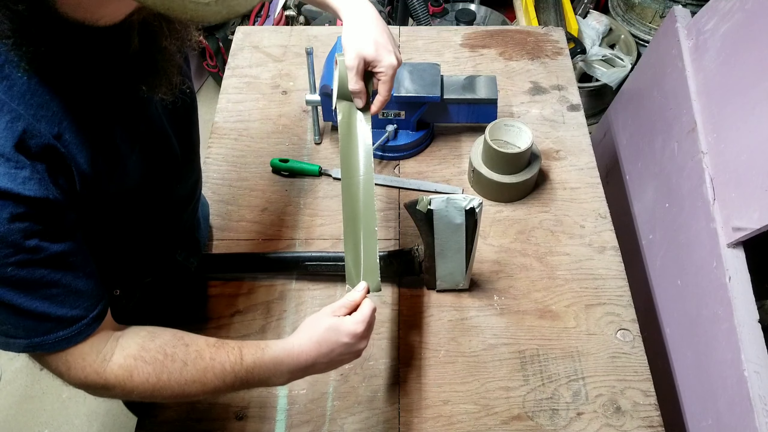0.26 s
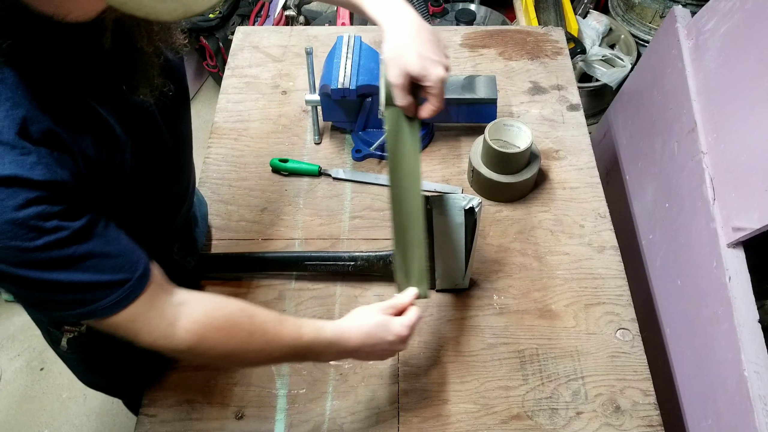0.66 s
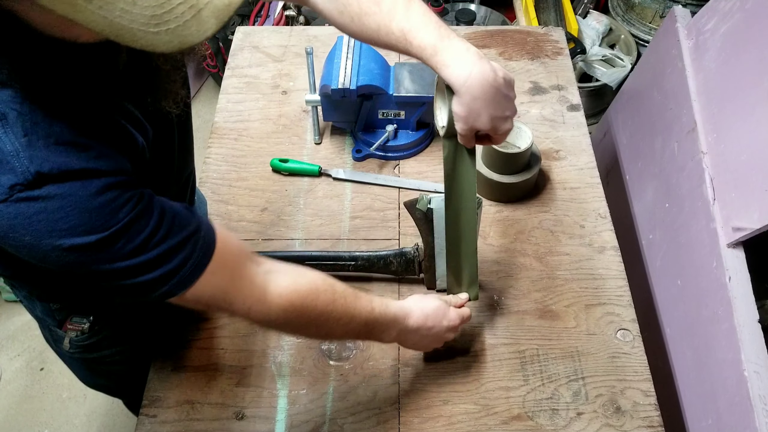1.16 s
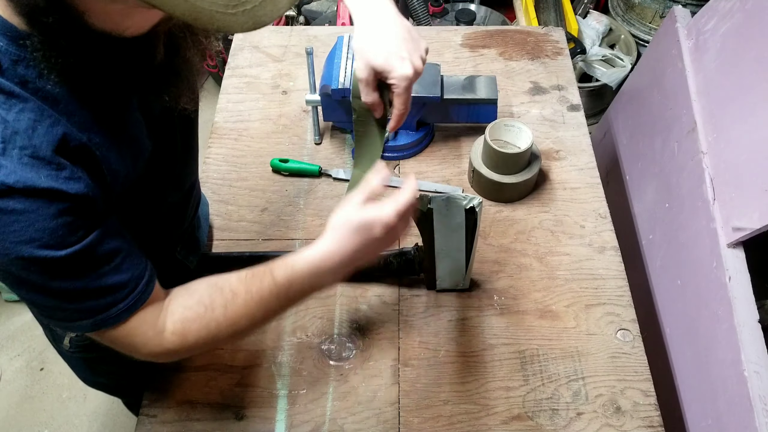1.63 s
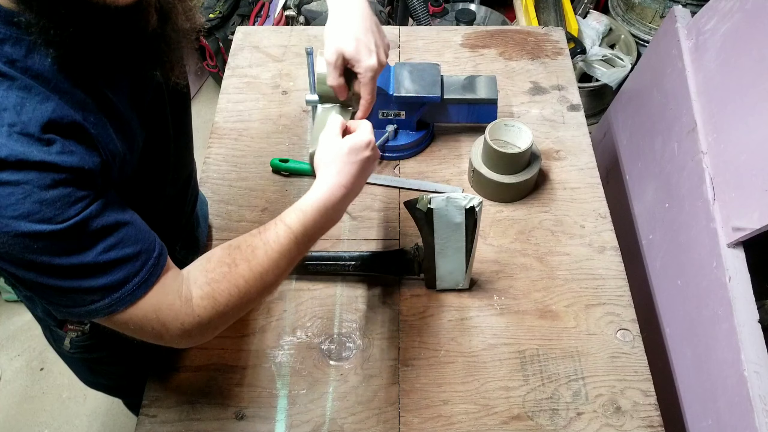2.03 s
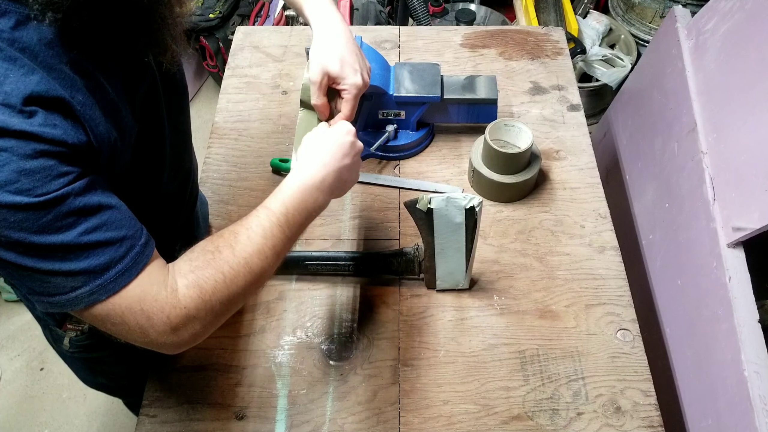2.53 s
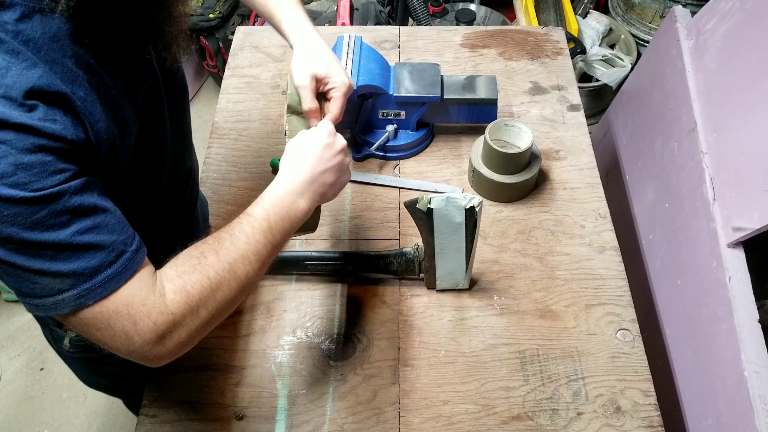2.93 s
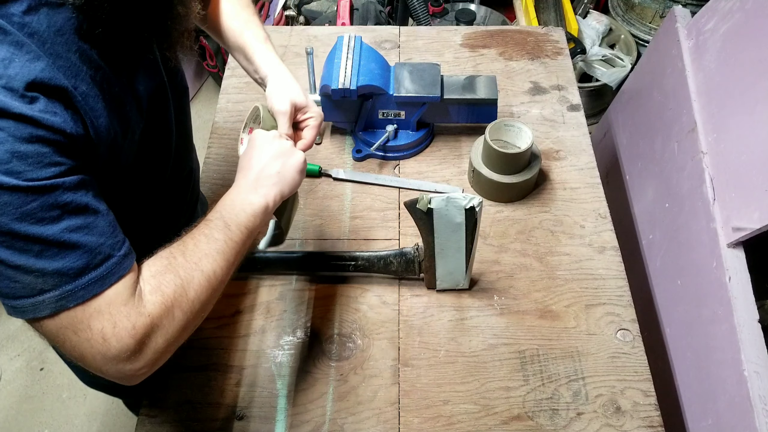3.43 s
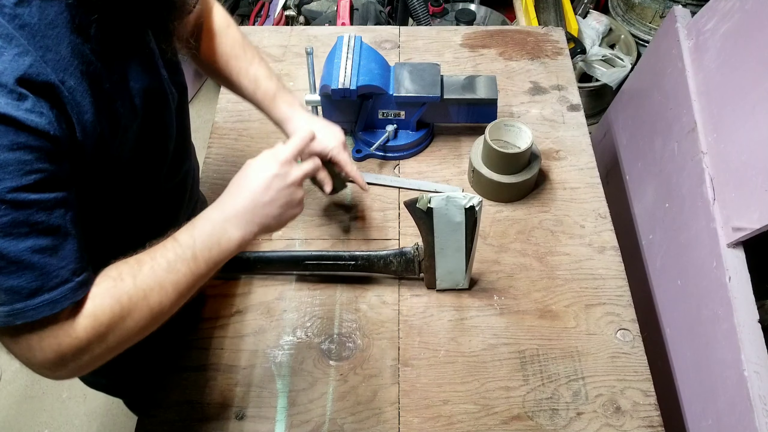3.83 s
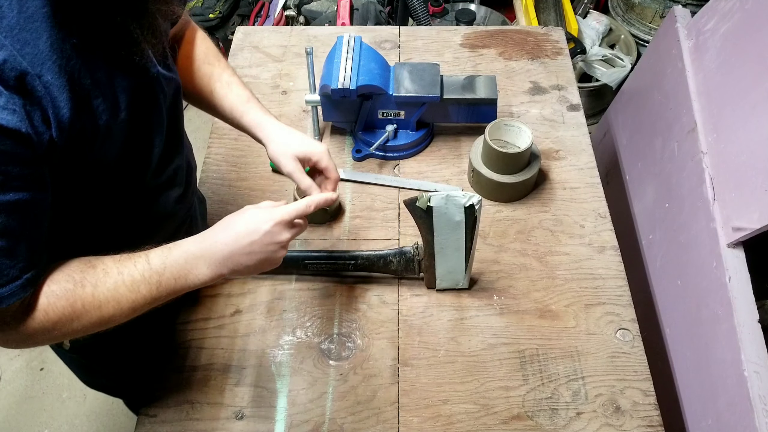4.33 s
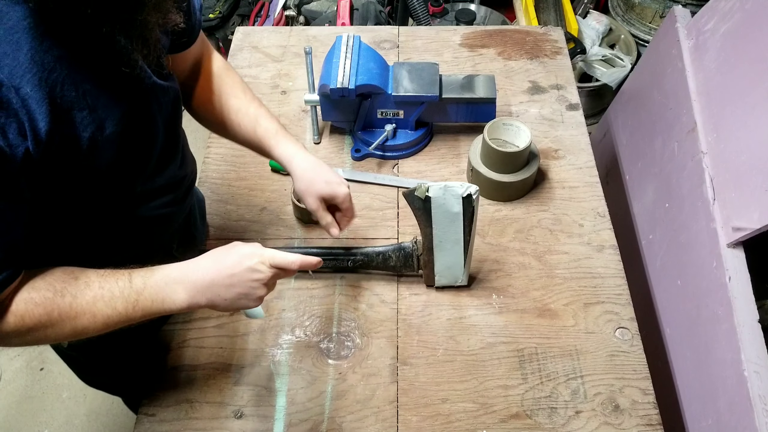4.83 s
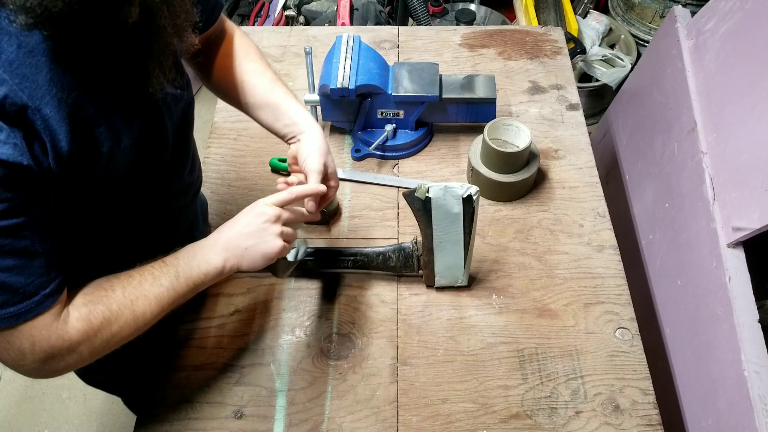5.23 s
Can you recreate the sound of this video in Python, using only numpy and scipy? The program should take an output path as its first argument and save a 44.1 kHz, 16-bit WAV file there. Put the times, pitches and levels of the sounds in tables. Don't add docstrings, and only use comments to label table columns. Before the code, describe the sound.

Quiet humming workshop, heard close and in stereo. After near silence, something lightly knocks the bench; glue threads tick and tape crinkles in small bursts. A loud snap and a short, bright, dense rip follow. The roll then drops in several heavy thuds, a tool handle clacks, and final small crackles return over a dull engine drone fading behind the wall.

```python
import sys
import numpy as np
from scipy import signal
from scipy.fft import rfft, irfft, next_fast_len
from scipy.io import wavfile
from scipy.ndimage import uniform_filter1d, map_coordinates

SR = 44100
rng = np.random.default_rng(int(sys.argv[2]) if len(sys.argv) > 2 else 0)


def store_pcm(level_fs):
    pcm = np.round(np.clip(level_fs, -1, 1) * 32767).astype(np.int16)
    wavfile.write(sys.argv[1], SR, np.atleast_2d(pcm).T)


def voltage_ratio(decibels):
    exponent = np.asarray(decibels, float) / 20
    return 10 ** exponent


N = 241844
T = np.arange(N) / SR


def unit(x):
    return x / np.sqrt(np.mean(x ** 2) + 1e-20)


def along(points, hz):
    f, v = np.transpose(points)
    return np.interp(np.log(hz + 1), np.log(f + 1), v, left=v[0], right=v[-1])


def curves(rows):
    s, *columns = np.transpose(rows)
    return [np.interp(T, s, column) for column in columns]


def wobble(rate):
    knots = rng.standard_normal(int(N * rate / SR) + 4)
    return map_coordinates(knots, [T * rate])


def filtered(x, response):
    m = next_fast_len(N + SR // 2)
    return irfft(rfft(x, m) * response(np.fft.rfftfreq(m, 1 / SR)), m)[..., :N]


def coloured(x, spectrum):
    level = voltage_ratio(along(spectrum, np.fft.rfftfreq(4096, 1 / SR)))
    cepstrum = irfft(np.log(level + 1e-5))
    cepstrum[1:2048] *= 2
    cepstrum[2049:] = 0
    pulse = irfft(np.exp(rfft(cepstrum)))
    return signal.fftconvolve(x, (pulse / np.linalg.norm(pulse))[None], axes=1)[:, :N]


def resonances(modes):
    def response(f):
        return sum((-1) ** k * voltage_ratio(db) * 1j * f * width / (hz * hz - f * f + 1j * f * width)
                   for k, (hz, width, db) in enumerate(modes))
    return response


def alike(pair, likeness):
    def shares(hz):
        turn = np.arccos(np.clip(along(likeness, hz), 0, 1)) / 2
        return np.array([np.cos(turn), np.sin(turn)])
    mid, side = filtered(pair, shares)
    return np.array([mid + side, mid - side])


def sides(db):
    return voltage_ratio(np.array([[db / 2], [-db / 2]]))


def add(track, s, t60, gain):
    part = track[..., round(s * SR):round(s * SR) + SR // 3]
    part += gain * voltage_ratio(-60 * T[:part.shape[-1]] / max(t60, .001))


def crackle(spread_db, clump_db, clump_rate):
    size = voltage_ratio(spread_db * rng.exponential(size=N) + clump_db * wobble(clump_rate))
    return unit(size * np.sign(rng.standard_normal((2, N))))


# f/Hz, level/dB per Hz
HISS_COLOUR = [(470, -40.5), (800, -10.5), (919, -9.5), (1060, 0.5), (1140, -6.5), (1520, -0.5), (2200, -4),
               (4750, -12.5), (7680, -16), (14800, 5.5), (16400, -20.5)]


def hiss():
    noise = coloured(rng.standard_normal((2, N)), HISS_COLOUR)
    return voltage_ratio(-76.5) * alike(noise, [(1000, 0.23), (10000, 0.48)])


# t/s, level/dB rms
HUM_LOAD = [
    (0.0, -53),
    (0.03, -56.5),
    (1.94, -56.5),
    (2.41, -49.5),
    (3.24, -52),
    (3.8, -61),
    (4.3, -49.5),
    (5.48, -54.5),
]
# f/Hz, level/dB rms
HUM_OVERTONES = [
    (463.0, -88),
]


def mains_hum():
    load_db, = curves(HUM_LOAD)
    lines = np.sin(2 * np.pi * 120.2 * T) + voltage_ratio(-15.0) * np.sin(2 * np.pi * 55.0 * T)
    hum = voltage_ratio(load_db + 3 + 1.4 * wobble(6.1)) * lines
    for hz, db in HUM_OVERTONES:
        hum = hum + np.sqrt(2) * voltage_ratio(db + 2.1 * wobble(3.2)) * np.sin(2 * np.pi * hz * T)
    return sides(-1.2) * hum


# t/s, firing f/Hz, level/dB
ENGINE_PASS = [
    (0, 88.2, -81),
    (1.2, 86.9, -66),
    (2.2, 87.2, -61.5),
    (2.9, 86.4, -50.5),
    (3.6, 85.36, -44),
    (4.0, 83.8, -41),
    (4.4, 80.47, -45),
    (4.8, 77.8, -45.5),
    (5.48, 74.9, -50.5),
]
# f/Hz, level/dB per Hz
RUMBLE_COLOUR = [(20, -24.5), (45, -5), (70, 5.5), (110, 0.5), (190, -3), (260, -8.5), (420, -17),
                 (700, -30), (1500, -39.5), (3000, -69.5)]


def passing_engine():
    firing_hz, level_db = curves(ENGINE_PASS)
    unsteady_db = 1.2 * wobble(6)
    phase = 2 * np.pi * np.cumsum(firing_hz + 0.41 * wobble(6)) / SR
    orders = voltage_ratio(level_db) * np.sin(phase) + voltage_ratio(level_db - 16.5) * np.sin(2 * phase)
    engine = np.sqrt(2) * voltage_ratio(unsteady_db) * orders
    noise = coloured(rng.standard_normal((2, N)), RUMBLE_COLOUR)
    rumble = unit(alike(noise, [(50, 0.46), (200, 0.82), (1000, .8)]))
    rumble_db = -43.5 + 0.26 * level_db + 1.3 * wobble(3.2)
    return sides(-2.5) * (engine + voltage_ratio(rumble_db) * rumble)


# f/Hz, t60/s
ROOM_T60 = [(100, 0.71), (500, 0.3), (2000, 0.29), (6000, 0.23), (10000, 0.19), (15000, 0.12)]
# f/Hz, likeness 0-1
ROOM_LIKENESS = [(100, 0.93), (500, 0.92), (1500, 0.63), (5000, 0.61)]


def room(x):
    wet, step = np.zeros((2, N + SR)), SR // 4
    for start in range(0, N, step):
        hz, t, z = signal.stft(rng.standard_normal((2, SR // 2)), SR, nperseg=256)
        decay = voltage_ratio(-60 * t / along(ROOM_T60, hz)[:, None])
        tail = signal.istft(z * decay, SR, nperseg=256)[1]
        part = signal.fftconvolve(x[None, start:start + step], tail / np.linalg.norm(tail[0]), axes=1)
        wet[:, start + 150:][:, :part.shape[1]] += part
    return alike(wet[:, :N], ROOM_LIKENESS)


# t/s, peak level/dB, chatter t60/s
TOOL_KNOCKS = [
    (0.906, -34, 0.1),
    (0.956, -50, 0.048),
    (1.788, -58, 0.12),
    (4.651, -28, 0.11),
    (4.7, -46.5, 0.078),
    (4.791, -52, 0.087),
]
# f/Hz, width/Hz, level/dB
HANDLE_MODES = [(507, 90, -1.5), (802, 66, 3.5), (1087, 83, 4), (1480, 145, -6), (1660, 145, -7.5),
                (1955, 40, 1), (2288, 47, -10.5), (2770, 150, -12), (3075, 115, -14), (3886, 70, -15.5),
                (4600, 800, -31), (4940, 70, -20.5), (5180, 120, -28), (6440, 2100, -37.5)]


def tool():
    chatter = np.zeros(N)
    for s, db, t60 in TOOL_KNOCKS:
        add(chatter, s - .004, t60, voltage_ratio(db + 12.0))
    grains = crackle(spread_db=3.5, clump_db=3.5, clump_rate=150)[0]
    building = uniform_filter1d(chatter, size=250, origin=124)
    return filtered(building * grains, resonances(HANDLE_MODES))


# t/s, peak level/dB, board note f/Hz, hardness 0-1
LANDINGS = [(.826, -49, 306, .05), (.847, -51, 302, 0.1), (.873, -45.5, 248, 0.14), (.906, -32, 360, 0.61),
            (.967, -38.5, 364, 0.55), (1.027, -53, 260, 0.6), (1.09, -52.5, 307, .5),
            (2.226, -49.5, 340, 0.83), (2.691, -56, 307, .7), (3.183, -46.5, 336, 1),
            (4.044, -17, 337.6, 0.8), (4.198, -16.5, 321, 0.93), (4.323, -21.5, 348, 0.89),
            (4.426, -30, 312, 0.72), (4.486, -29.5, 361, 0.45), (4.564, -34.5, 290, 0.39),
            (4.651, -23.5, 362.4, 0.67), (4.69, -30.5, 336, 0.27), (4.788, -38.5, 350, 0.98)]
# f/Hz, width/Hz, level/dB
FRAME_MODES = [(58, 7.7, -2.5), (77.1, 9.9, -0.5), (157, 8.4, -3.5), (194.3, 16, -6), (260, 13, -10.5)]
# f/Hz, level/dB per Hz
WOOD_COLOUR = [(100, -22), (250, -1), (400, 0.5), (580, 2), (750, -4.5), (950, -5.5), (1200, -16),
               (1650, -21.5), (2200, -35), (4000, -45), (9000, -50.5)]


def bench():
    pressed, shaken, pushes = np.zeros((3, 1, N))
    t, contact_s = T[:SR // 20], .012
    held = np.clip(5 * t / contact_s, 0, 1) * np.clip(4 * (1.3 - t / contact_s), 0, 1)
    for s, db, hz, hard in LANDINGS:
        wood_db = np.interp(hard, [0, 1], [-36, -7])
        boom_db = np.interp(hard, [0, 1], [11.5, -15])
        note = np.sin(2 * np.pi * hz * t - 1.5) + voltage_ratio(-7.5) * np.sin(2 * np.pi * 1.76 * hz * t)
        pressed[0, round((s - .002) * SR):][:len(t)] += voltage_ratio(db - 1) * held * note
        add(shaken, s - .002, .16, voltage_ratio(db + wood_db))
        pushes[0, round(s * SR)] = voltage_ratio(db + boom_db + 56.5)

    def soft(hz, edge_hz):
        return 1 / (1 + 1j * hz / edge_hz) ** 3

    def frame(hz):
        return resonances(FRAME_MODES)(hz) * soft(hz, 390) * (1j * hz / (60 + 1j * hz)) ** 3

    board = filtered(pressed, lambda hz: soft(hz, 630))
    return filtered(pushes, frame) + board + coloured(shaken * rng.standard_normal(N), WOOD_COLOUR)


# f/Hz, likeness 0-1
STRIP_LIKENESS = [(500, 0.97), (1500, 1), (3000, 0.84), (12000, 0.45)]


def across_strip(pair):
    return alike(pair, STRIP_LIKENESS)


# t/s, peak level/dB, burst t60/s
NAIL_PICKS = [(1.568, -51, .12), (1.5833, -48.5, 0.11), (2.0654, -55, .043), (2.3344, -97, .053),
              (2.5292, -46.5, 0.062), (2.9148, -54.5, 0.2), (3.053, -48, 0.08), (3.1198, -59, .055),
              (3.285, -37.5, .054), (3.4505, -37, .035), (3.47, -39.5, .097), (3.5037, -30.5, 0.072),
              (3.533, -34, 0.043), (3.711, -48, .03), (4.3221, -63.5, .083)]
# t/s, peak level/dB, burst t60/s
CORNER_SNAPS = [(0, -64, 0.2), (.4244, -67.5, 0.21), (0.459, -65.5, 0.11), (1.35, -62, 0.46),
                (1.38, -43, 0.055), (1.805, -61.5, 0.33), (2.0018, -46, .071), (2.3196, -56, 0.087),
                (2.4524, -33.5, 0.048), (2.673, -54, 0.13), (3.1852, -25, 0.034), (3.1866, -12.5, 0.018),
                (3.215, -31.5, 0.11), (3.238, -42, 0.051), (3.271, -40, 0.071), (3.7256, -20.5, .041),
                (5.3457, -55, 0.11), (5.3605, -46, 0.12)]
# t/s, peak level/dB, burst t60/s
WIDE_PEELS = [(1.5993, -43, 0.034), (1.736, -62, 0.18), (2.1121, -38, 0.028), (2.1247, -48, 0.089),
              (2.2048, -45.5, 0.081), (2.2267, -40.5, 0.068), (2.4084, -52, 0.11), (2.4769, -49, 0.22),
              (3.8331, -43, 0.092), (3.8462, -30, 0.084), (4.4281, -32.5, 0.066), (4.9027, -44.5, 0.11),
              (5.42, -41.5, .067), (5.442, -39.5, .06)]
# t/s, peak level/dB, burst t60/s
LOOSE_FOLDS = [(2.1024, -54.5, .07), (2.1508, -46.5, 0.061), (2.186, -51.5, 0.16), (2.234, -45.5, 0.05),
               (2.6948, -48.5, 0.18), (3.756, -39.5, 0.073), (4.0879, -50, .13), (4.91, -53.5, 0.12)]
# t/s, crinkle level/dB
FINGER_WORK = [(0, -100), (.68, -89), (.9, -75), (1.0, -101), (1.25, -82), (1.71, -88.5), (2.07, -66.5),
               (2.33, -63), (2.71, -75.5), (2.91, -80.5), (3.3, -72), (3.44, -78), (3.65, -61.5),
               (3.836, -63.5), (4.6, -73.5), (4.7, -82), (5.3, -73.5), (5.48, -55)]
# f/Hz, level/dB per Hz
STRIP_BRIGHT = [(6000, -43.5), (8300, -13), (10000, -4.5), (11000, -1), (14800, 0.5), (16000, -16)]
STRIP_MIDDLE = [(2000, -40.5), (3300, -13), (4500, -4.5), (6700, -1.5), (7600, -7), (8500, -23.5),
                (11000, -38.5)]
STRIP_DULL = [(300, -2.5), (800, -10), (1500, -6), (2500, 1), (3400, -6), (4500, -15), (7000, -58.5)]


def handled_strip():
    bursts, cracks = np.zeros((2, 3, 2, N))
    kinds = [(NAIL_PICKS, (-15, -24.5, -9, 4.5)),
             (CORNER_SNAPS, (-2, -17.5, -9, 6.5)),
             (WIDE_PEELS, (-1, 1, -8, 6.5)),
             (LOOSE_FOLDS, (2, 7.5, -24, 6.5))]
    for releases, (middle_db, dull_db, crack_db, pan_db) in kinds:
        for s, db, t60 in releases:
            gain = voltage_ratio(db + np.array([0, middle_db, dull_db]))[:, None, None] * sides(pan_db)
            add(bursts, s, t60, voltage_ratio(-12.0) * gain)
            add(cracks, s + .0005, .005, voltage_ratio(crack_db) * gain)
    crinkle_parts = voltage_ratio(np.array([0, -5.5, -7]))[:, None, None]
    bursts += voltage_ratio(curves(FINGER_WORK)[0] - 2.5) * crinkle_parts
    clicks = across_strip(crackle(spread_db=2.5, clump_db=3.5, clump_rate=160))
    crack_noise = across_strip(np.sign(rng.standard_normal((2, N))))
    drive = bursts * clicks + cracks * crack_noise
    return sum(map(coloured, drive, (STRIP_BRIGHT, STRIP_MIDDLE, STRIP_DULL)))


# t/s, peak level/dB
PARTING_THREADS = [(1.38, -35.5), (1.6, -29), (2.0026, -35), (2.1125, -30), (2.3205, -47), (2.4528, -40),
                   (3.1876, -14), (3.4507, -34.5), (3.469, -30.5), (3.503, -27), (3.551, -9.5),
                   (3.571, -9.5), (3.583, -10), (3.7268, -16.5), (3.8472, -41), (4.429, -22.5)]
# f/Hz, level/dB per Hz
TEAR_COLOUR = [(200, -34.5), (350, -10.5), (700, -15), (1100, -7.5), (1600, -13), (2300, -5.5),
               (4700, -2.5), (6500, 0.5), (8900, -7), (12100, 1.5), (15200, -2), (16000, -21)]


def torn_strip():
    start_s, bite_s, run_s, t60_s = 3.533, 0.0099, 0.029, .07
    run = T - start_s - bite_s
    swell_db = 6 * np.clip(run / run_s, 0, 1)
    fade_db = 60 * np.clip(run - run_s, 0, None) / t60_s
    tear = np.clip(1 + run / bite_s, 0, 1) ** 3 * voltage_ratio(-24.5 + swell_db - fade_db)
    tear = tear * across_strip(crackle(spread_db=3, clump_db=3, clump_rate=300))
    ring = np.cos(2 * np.pi * 12000 * T[:SR // 3])
    for s, db in PARTING_THREADS:
        add(tear, s, .0012, voltage_ratio(db - 7.5) * np.sign(rng.standard_normal()) * ring)
    return coloured(sides(6.1) * tear, TEAR_COLOUR)


def scene():
    background = mains_hum() + passing_engine()
    handle, wood = sides(6.1) * tool(), sides(-1.6) * bench()
    tape = handled_strip() + torn_strip()
    to_room = voltage_ratio(-4) * tape.mean(0) + voltage_ratio(-5.0) * wood.mean(0) + voltage_ratio(-2.5) * handle.mean(0)
    return background + room(to_room) + handle + wood + tape


def top_cut(x):
    return signal.sosfilt(signal.butter(12, 16650, fs=SR, output="sos"), x)


def record(dry):
    def band_limit(hz):
        return voltage_ratio(-28 * np.clip((hz - 15700) / 150, 0, 1)) * (hz < 16600)
    limited = filtered(dry + hiss(), band_limit)
    return top_cut(limited)


dry = scene()
out = record(dry)
store_pcm(out)
```